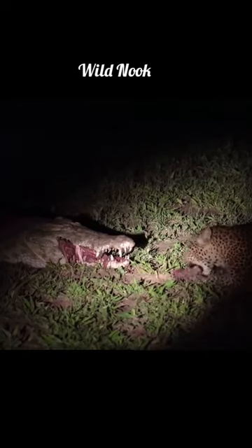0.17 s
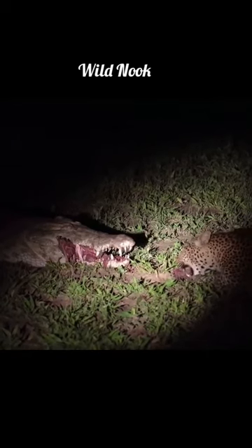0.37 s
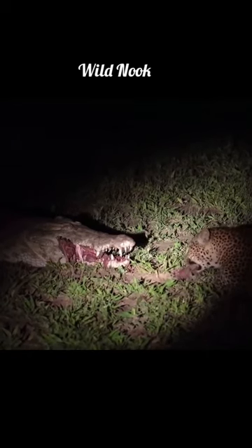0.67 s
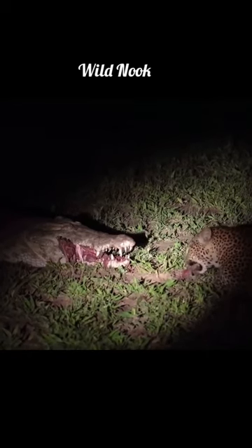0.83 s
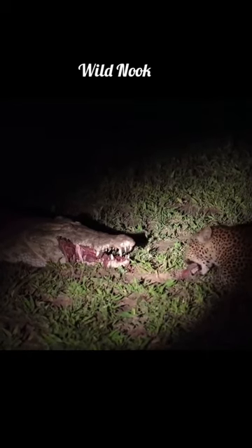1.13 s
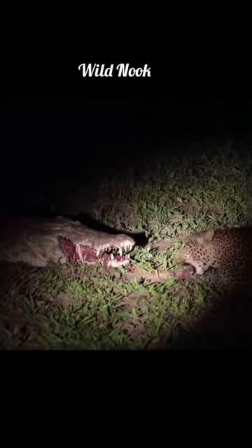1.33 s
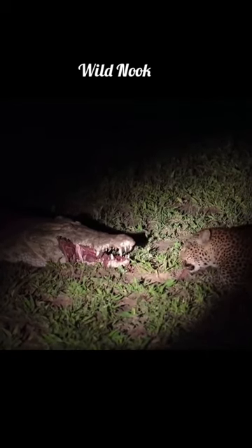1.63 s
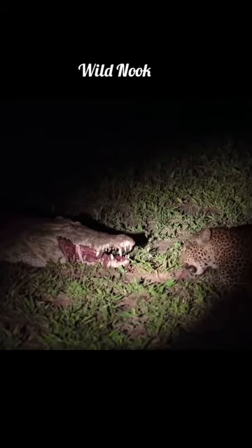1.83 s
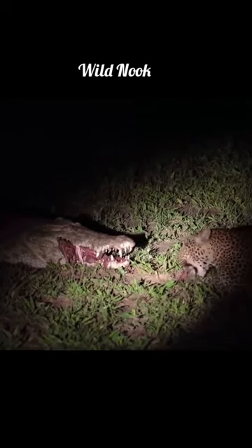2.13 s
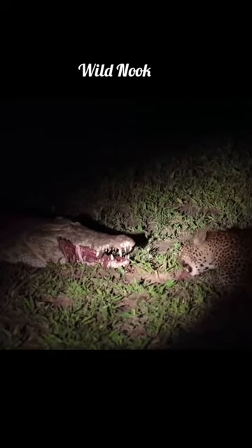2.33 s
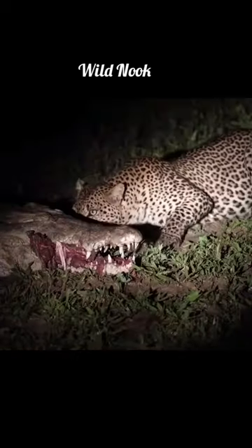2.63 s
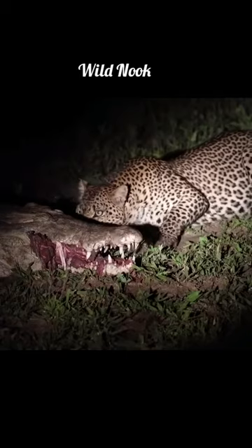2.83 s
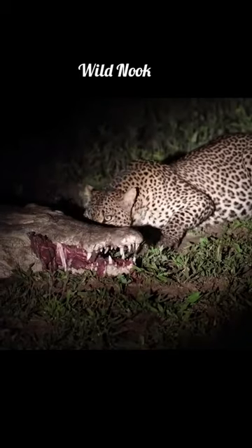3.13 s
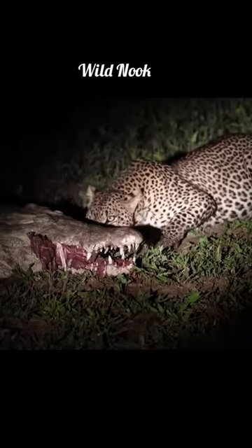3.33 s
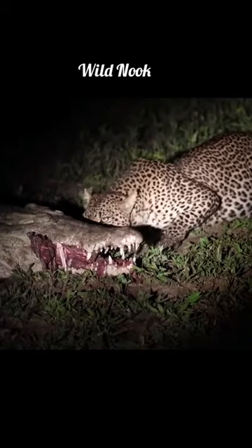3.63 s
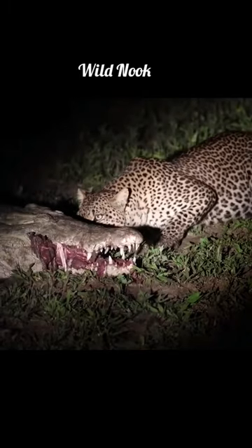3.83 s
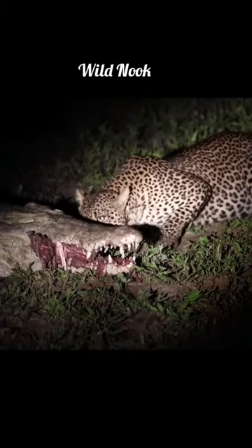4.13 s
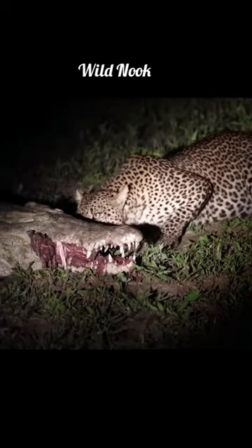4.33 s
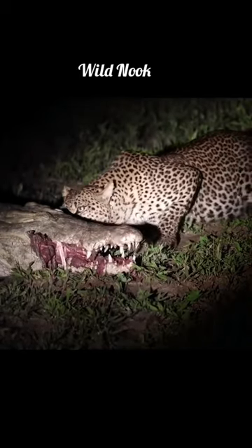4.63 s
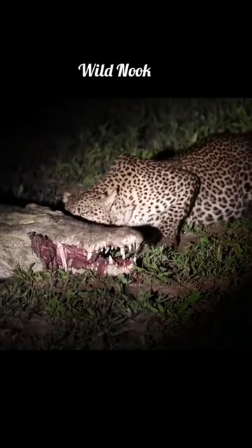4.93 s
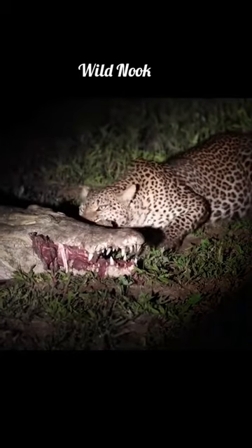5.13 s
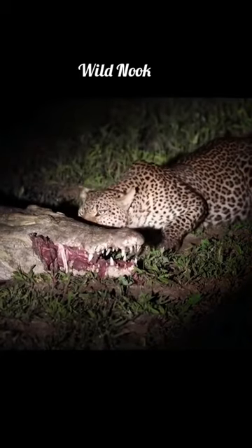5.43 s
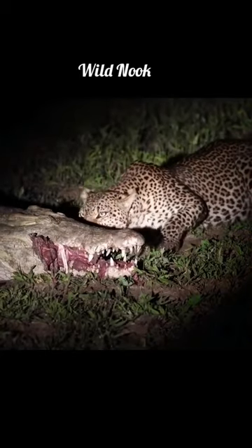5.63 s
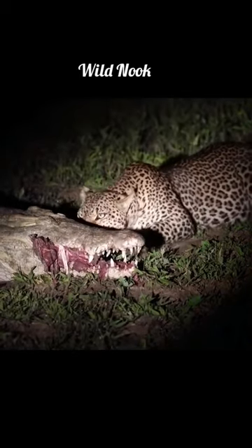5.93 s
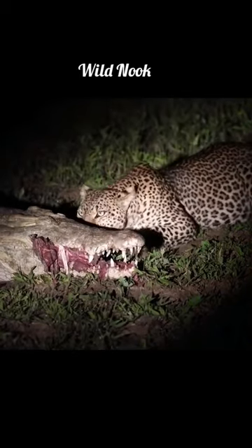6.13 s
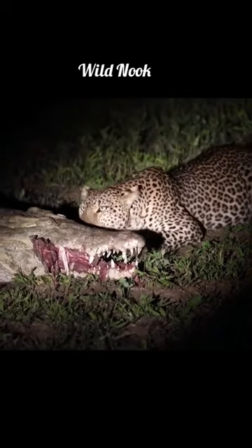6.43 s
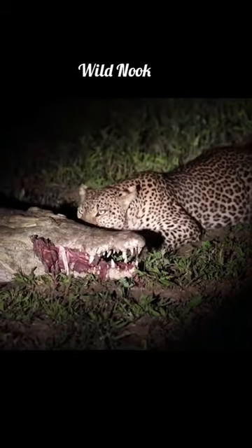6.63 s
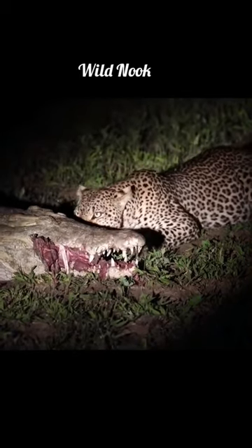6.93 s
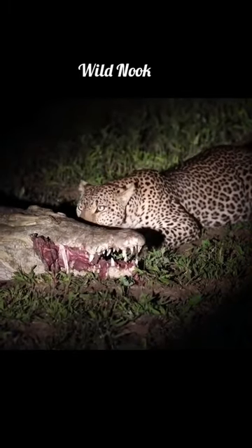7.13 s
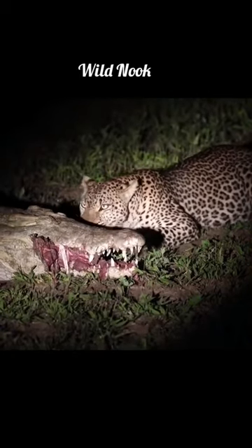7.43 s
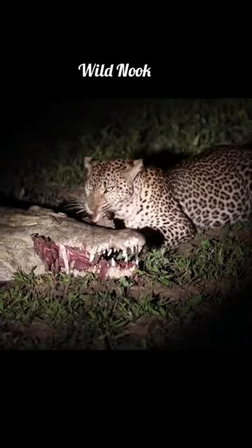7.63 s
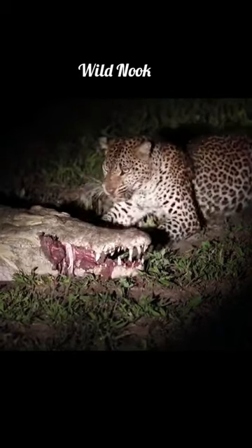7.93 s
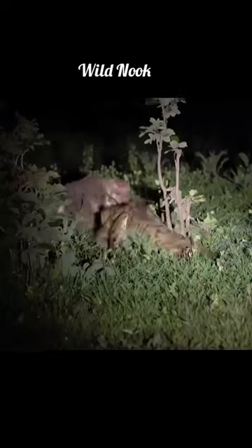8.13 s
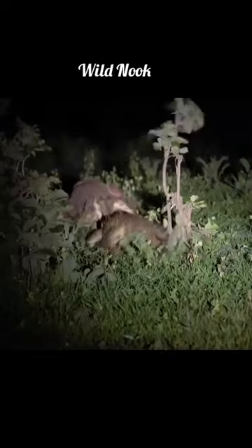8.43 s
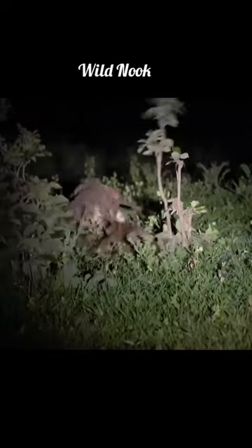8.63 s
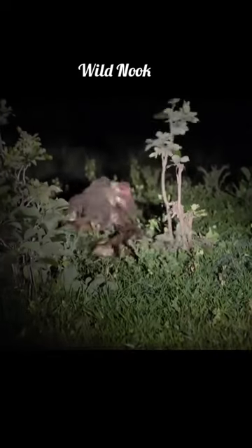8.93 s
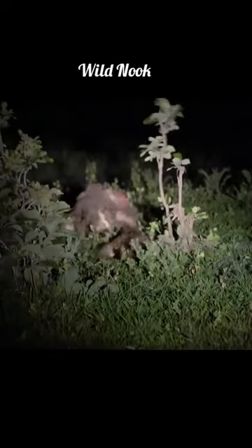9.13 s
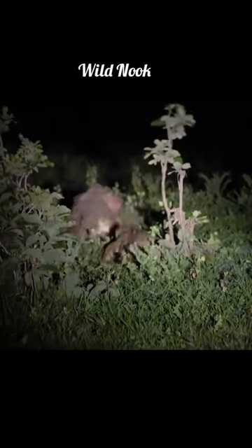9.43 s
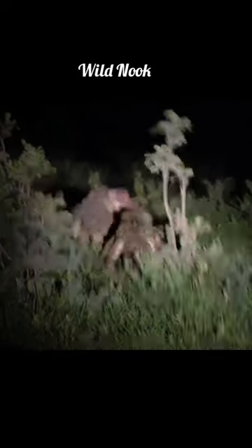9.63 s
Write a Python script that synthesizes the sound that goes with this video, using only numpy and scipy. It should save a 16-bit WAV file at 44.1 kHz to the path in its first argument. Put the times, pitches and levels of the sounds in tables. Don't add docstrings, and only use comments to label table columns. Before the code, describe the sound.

Outdoors at night, short high frog whistles sit mostly left over a dense rasp of insects, with a bush-cricket buzzing in regular bursts. Grass stirs and faint bat sweeps pass. After a cut, a big cat gives low, pulsing growls close by. Another cut removes the growl, leaving snapping stems and swishing leaves. Stereo phone microphone, open air.

```python
import sys
import numpy as np
from scipy import signal
from scipy.fft import rfft, irfft
from scipy.io import wavfile
from scipy.ndimage import uniform_filter1d

SR = 44100
rng = np.random.default_rng(int(sys.argv[2]) if len(sys.argv) > 2 else 0)


def convert_level_to_amplitude(level_db):
    exponent = np.asarray(level_db, float) / 20
    return 10 ** exponent


def output_pcm(signal):
    pcm = np.clip(np.atleast_2d(signal).T, -1, 1) * 32767
    wavfile.write(sys.argv[1], SR, np.round(pcm).astype(np.int16))


N = 430857
T = np.arange(N) / SR
HZ = np.fft.rfftfreq(N, 1 / SR)
FIRST_CUT_S, SECOND_CUT_S = 2.58, 8.125


def level(x, db):
    return x * convert_level_to_amplitude(db) / np.sqrt(np.mean(x ** 2))


def curve(rows):
    s, db = np.transpose(rows)
    return np.interp(T, s, db, left=-120, right=-120)


def bouts(rows, fade_s):
    gain = sum(convert_level_to_amplitude(db) * ((T >= start) & (T < end)) for start, end, db in rows)
    return uniform_filter1d(gain, size=int(fade_s * SR))


def walk(rate):
    k = int(SR / rate)
    steps = np.repeat(rng.standard_normal(N // k + 1), k)
    return 1.7 * uniform_filter1d(uniform_filter1d(steps, k), k)[:N]


def add(out, s, x):
    i = max(int(s * SR), 0)
    out[..., i:i + x.shape[-1]] += x[..., :N - i]


def place(x, pan_db, size):
    return np.array([x * convert_level_to_amplitude(pan_db / 2), np.roll(x, size) * convert_level_to_amplitude(-pan_db / 2)])


def chirp(hz, shape):
    return shape * np.sin(2 * np.pi * np.cumsum(hz) / SR)


def band(x, low_hz, high_hz):
    return signal.sosfilt(signal.butter(4, [low_hz, high_hz], "band", fs=SR, output="sos"), x)


def throat(flow, modes):
    out = 0
    for hz, width, db in modes:
        b, a = signal.iirpeak(hz, hz / width, fs=SR)
        out = out + convert_level_to_amplitude(db) * signal.lfilter(b, a, signal.lfilter(b, a, flow))
    return out


def haze(spectrum, alike_hz, flicker_db, rate):
    hz, db = np.transpose(spectrum)
    octave = np.log2(HZ + 1)
    colour = convert_level_to_amplitude(np.interp(octave, np.log2(hz), db, left=-120, right=-120))
    mid, side = rfft(rng.standard_normal((2, N))) * colour
    both = mid + np.minimum(HZ / alike_hz, 1) * side * np.array([[1], [-1]])
    out = 0
    for centre in np.arange(np.log2(hz[0]), np.log2(hz[-1]) + .5, .5):
        part = irfft(both * np.clip(1 - 2 * abs(octave - centre), 0, 1), N)
        out = out + part * convert_level_to_amplitude(flicker_db * walk(rate))
    return out


# start in seconds, peak level in dB, pitch in Hz.
LOW_FROGS = [(0.0246, -30, 2508), (0.2678, -32, 2514), (0.3735, -33, 2570), (0.5775, -32, 2473),
             (1.494, -31, 2490), (1.9968, -36, 2420), (2.0632, -30, 2540), (2.2143, -33, 2520),
             (2.5717, -32.5, 2550), (2.6399, -34, 2510), (3.118, -33, 2515), (3.372, -34.5, 2580),
             (3.5688, -34, 2470), (3.7242, -33.5, 2430), (4.1025, -33, 2490), (4.567, -36, 2610),
             (4.7092, -35.5, 2614), (5.0206, -32.5, 2510), (6.0082, -33.5, 2500), (7.0381, -35, 2480),
             (7.2, -35, 2480), (7.4145, -34, 2510), (7.673, -34, 2460), (8.094, -28.5, 2525),
             (8.1585, -32, 2540), (8.6178, -33.5, 2532), (8.765, -34, 2454), (9.2378, -32.5, 2430),
             (9.5971, -34, 2492), (9.6699, -37.5, 2520)]
# start in seconds, peak level in dB, pitch in Hz.
HIGH_VOICES = [(0.034, -33.5, 2740), (0.571, -33.5, 2735), (1.042, -33.5, 2660), (1.15, -34, 2700),
               (1.299, -29.5, 2730), (1.889, -29, 2740), (2.4633, -29.5, 2715), (3.0634, -36, 2670),
               (3.513, -35, 2750), (3.9965, -35, 2760), (4.405, -35.5, 2672), (4.835, -36, 2656),
               (5.34, -32, 2620), (8.557, -32.5, 2690), (9.0363, -34, 2700)]
# start in seconds, peak level in dB, pitch in Hz.
FARTHER_FROGS = [(0.162, -35, 2430), (0.3287, -35, 2530), (0.426, -33, 2610), (0.7467, -33, 2420),
                 (0.833, -45, 2450), (0.8799, -33.5, 2540), (0.9262, -34.5, 2480), (0.9685, -35, 2580),
                 (1.3867, -34.5, 2490), (1.434, -31, 2580), (1.5703, -39, 2480), (1.6637, -30.5, 2530),
                 (1.7908, -37, 2510), (2.1475, -38, 2450), (2.3057, -35, 2460), (2.3555, -36, 2456),
                 (2.772, -33.5, 2340), (2.8424, -36, 2380), (3.0008, -38, 2420), (3.2056, -33, 2420),
                 (3.4394, -35, 2380), (3.64, -39.5, 2380), (3.8242, -39, 2420), (4.1977, -32.5, 2420),
                 (4.2546, -43, 2420), (4.333, -35, 2445), (4.6298, -34, 2480), (4.8963, -35.5, 2550),
                 (5.0699, -32, 2536), (5.119, -37, 2530), (5.2016, -35.5, 2475), (5.2545, -39, 2564),
                 (5.3727, -32, 2550), (5.4408, -32.5, 2540), (5.4979, -40, 2470), (5.6281, -43, 2370),
                 (5.676, -41, 2590), (5.7174, -35, 2500), (5.772, -35.5, 2520), (5.8396, -32.5, 2720),
                 (6.131, -35.5, 2700), (6.2778, -37, 2450), (6.5992, -39, 2484), (6.6932, -43, 2480),
                 (6.8023, -38, 2525), (6.9174, -39, 2570), (7.1292, -40, 2720), (7.3152, -32.5, 2506),
                 (7.7316, -44, 2560), (7.864, -37, 2480), (8.0032, -36, 2670), (8.2162, -36.5, 2620),
                 (8.2756, -36, 2490), (8.413, -34.5, 2566), (8.6797, -39, 2380), (9.1323, -32, 2506),
                 (9.3636, -38, 2383), (9.4444, -33.5, 2710), (9.749, -37, 2382)]


def frogs(calls):
    out = np.zeros(N)
    for (s, db, hz), (longer, flutter) in zip(calls, rng.random((len(calls), 2))):
        u = np.linspace(0, 1, int(SR * .028 * (.75 + .5 * longer)))
        shape = np.minimum(u / .12, 1) * (1 - u ** 3)
        shape = shape * (1 - .25 * flutter * (1 + np.cos(2 * np.pi * 3 * u)))
        rise = 1 + .125 * (u ** 0.745 - .5)
        add(out, s, convert_level_to_amplitude(db + 3.5) * chirp(hz * rise, shape))
    return out


def crowd():
    spread, lowest = [N / SR, 6, 320], [0, -48.5, 2400]  # s, dB, Hz
    left, ahead = rng.random((2, 170, 3)) * spread + lowest
    return place(frogs(left), 7.9, size=8) + place(frogs(ahead), 0.5, size=5)


# start in seconds, end in seconds, level in dB.
BUZZ_BURSTS = [(0.029, 0.213, -41), (0.644, 0.92, -39.5), (0.998, 1.325, -42), (1.338, 1.576, -36.5),
               (1.734, 1.997, -37), (2.129, 2.406, -36), (2.577, 2.763, -35), (2.894, 3.178, -36),
               (3.308, 3.624, -36), (3.74, 4.025, -37), (4.149, 4.435, -35), (4.57, 4.85, -36),
               (4.984, 5.205, -35.5), (5.591, 5.79, -35.5), (6.018, 6.26, -35.5), (6.429, 6.67, -35.5),
               (6.828, 7.074, -35), (7.214, 7.47, -34.5), (7.615, 7.861, -35.5), (8.105, 8.212, -35.5),
               (8.341, 8.663, -36.5), (8.774, 9.071, -36), (9.18, 9.477, -35.5), (9.605, 9.8, -35.5)]
# multiple of the tooth rate, level in dB.
WING_OVERTONES = [(42, -14), (43, -4), (44, -3), (45, 0), (46, -0.5), (47, -6), (48, -15)]


def bush_cricket():
    since = sum((T - a) * ((T > a - .02) & (T < b + .02)) for a, b, _ in BUZZ_BURSTS)
    stroke = 2 * np.pi * (51 * since + .08 * walk(12) - .25)
    stroke_db = 5
    teeth = 2 * np.pi * np.cumsum(139.8 * (1 + .0022 * walk(25))) / SR
    clean = 0
    for k, db in WING_OVERTONES:
        throb_db = stroke_db * np.cos(stroke + .3 * (k - 45))
        clean = clean + convert_level_to_amplitude(db + 1.5 * walk(40) + throb_db) * np.cos(k * teeth + .8 * (k - 45) ** 2)
    ragged = band(rng.standard_normal(N), 5920, 6595) * convert_level_to_amplitude(stroke_db * np.cos(stroke))
    gate = 0
    for start, end, db in BUZZ_BURSTS:
        swell_db = ((T - start) / 0.4 - .5).clip(-1, 1)
        gate = gate + convert_level_to_amplitude(db + swell_db) * ((T > start) & (T < end))
    return level(level(clean, 0) + level(ragged, -6), 0.5) * uniform_filter1d(gate, size=600)


# time in seconds, level in dB.
SWARM_LEVEL = [
    (0, -40),
    (.5, -47.5),
    (.8, -38.5),
    (1.3, -37),
    (1.6, -36),
    (1.7, -42.5),
    (9.4, -42),
    (9.77, -43),
]


def swarm():
    colour = [(5200, -18.0), (5900, -8), (6500, -12), (7200, -7.5), (7900, -28.0), (8500, -23.0)]  # Hz, dB
    rasp = haze(colour, 6000, 1.1, 14)
    throb = convert_level_to_amplitude(1.6 * np.sin(2 * np.pi * np.cumsum(73 * (1 + 0.0312 * walk(4.5))) / SR))
    return level(rasp * throb, 2.87) * convert_level_to_amplitude(curve(SWARM_LEVEL) + 1.8 * walk(4))


# time in seconds, level in dB.
SHRILL_LEVEL = [
    (0, -51.5),
    (2.95, -50),
    (3.05, -52.5),
    (8.6, -51),
    (8.75, -48.5),
    (9.77, -47.5),
]


def shrill():
    colour = [(8300, -7), (9300, -9), (10500, -3.5), (11600, 0.5), (13500, -2), (14600, -4), (15500, -7)]
    hiss = haze(colour, 6000, 1.0, 16)
    fresh_s = np.where(T < FIRST_CUT_S, 1.2, 5.64)
    faded = (T - fresh_s) / .585 % 1
    throb_db = 5 * uniform_filter1d(.5 - faded, size=2500) * np.where(T < SECOND_CUT_S, 1, .3)
    return level(hiss, 0.48) * convert_level_to_amplitude(curve(SHRILL_LEVEL) + throb_db)


# frequency in Hz, level in dB per Hz.
FAR_SPECTRUM = [(1500, -50), (1900, -17), (2220, -10), (2540, -5.5), (2860, -12), (3050, -24), (3500, -21),
                (4260, -6.5), (4920, -11), (6230, -5), (7510, -3.5), (8300, -20), (9000, -45)]


def far_chorus():
    return level(haze(FAR_SPECTRUM, 3000, 1.3, 8), -38)


# (frequency in Hz, level in dB per Hz).
LOW_AIR = [
    (0, 2.58, -58, [(15, -54), (25, -37), (90, -18), (384, -22), (534, -15), (909, -10.5), (1390, -12), (2000, -9), (2600, -45), (4400, -120)]),
    (2.58, 8.125, -57.5, [(15, -39), (25, 7.5), (65, -4), (266, -12.5), (554, -7), (757, -9), (926, -2.5), (1050, -7), (1610, -5.5), (2000, -6.5), (2600, -58), (4400, -120)]),
    (8.125, 9.78, -54.5, [(15, -36), (25, -9), (112, -8.5), (338, -9), (814, -16), (909, -5.5), (1520, -4.5), (2000, -0.5), (2600, -24), (4400, -120)]),
]


def air():
    out = 0
    for start, end, db, colour in LOW_AIR:
        gate = uniform_filter1d(1. * ((T >= start) & (T < end)), size=200)
        out = out + level(haze(colour, 630, 3.28, 7.6), db) * gate
    return out


# start in seconds, end in seconds, level in dB.
GRASS_MOVES = [
    (0, 0.62, -62),
    (.6, 1.69, -58),
    (1.78, 2.63, -64.5),
    (2.58, 8.3, -64.5),
    (8.12, 8.4, -63.5),
    (8.4, 9.8, -56.5),
]
# time in seconds, peak level in dB, thud pitch in Hz, left minus right in dB.
STEM_SNAPS = [(0.097, -48.5, 760, 5), (1.12, -53, 210, 0.5), (1.191, -52, 820, 6), (1.5, -54, 199, -2),
              (7.021, -45, 1200, 0.5), (8.7, -68, 175, 0.5), (1.231, -33.5, 1830, -12),
              (1.615, -35.5, 2160, -16), (1.721, -47, 1200, -20), (1.738, -40, 720, -7),
              (2.666, -51, 615, -2.0), (3.511, -39.5, 223, 0), (3.725, -44, 655, -3),
              (4.043, -36.5, 784, -1), (4.797, -42, 895, -2), (4.858, -34.5, 1230, -1),
              (8.084, -45, 1225, 3), (8.439, -43, 1470, 6), (8.552, -42, 212, 0), (8.628, -40, 1210, 5),
              (8.792, -38, 1637, 3), (8.818, -39, 1460, -1), (9.04, -56, 1490, 18), (9.084, -36.5, 753, 1),
              (9.131, -38, 1500, 6), (9.472, -39, 1390, 1), (9.724, -40.5, 1576, -2)]
# time in seconds, peak level in dB, pitch in Hz, left minus right in dB.
PAW_CRACKLES = [(3.479, -49, 541, -0.5), (3.599, -45, 880, 0.0), (6.479, -44, 719, 0.0),
                (8.399, -45, 1910, -2), (8.519, -48, 1920, 2), (8.739, -40, 1967, 0.0),
                (8.759, -36, 1676, -1.0), (8.839, -48, 1320, 0.0), (9.006, -47, 1700, 1.5),
                (9.115, -37.5, 1160, -0.5), (9.226, -45, 1400, 0.5), (9.438, -41, 1940, -1.0),
                (9.531, -43, 1462, -1)]


def grass():
    struck = rng.random((2, N)) < 1500 / SR
    size = convert_level_to_amplitude(2.8 * rng.exponential(size=(2, N)).clip(0, 5))
    grains = struck * size * rng.standard_normal((2, N))
    grains = grains + 2.14 * grains[::-1]
    rustle_s = 0.069
    rustles = [(s - rustle_s / 2, s + rustle_s / 2, db - 22.5) for s, db, _, _ in STEM_SNAPS]
    stir = bouts(GRASS_MOVES + rustles, 0.058) * convert_level_to_amplitude(1.23 * walk(5.5))
    out = level(band(grains, 269, 5070), 2.7) * stir
    t = np.arange(900) / SR
    snaps = STEM_SNAPS + [(s, db - 3.5, hz, pan_db) for s, db, hz, pan_db in PAW_CRACKLES]
    noises = rng.standard_normal((len(snaps), 2, 900)) + 14 * (t == 0)
    for (s, db, hz, pan_db), noise in zip(snaps, noises):
        crack = .6 * min(hz / 800, 1) ** 2 * band(noise[0] * np.exp(-t / .0022), 300, 4500)
        thud = throat(noise[1] * np.exp(-t / .006), [(hz, .8 * hz, 0), (.4 * hz, .3 * hz, -3)])
        thud = band(1.3 * thud / abs(thud).max(), 90, 6000)
        add(out, s, place(convert_level_to_amplitude(db) * (thud + crack), pan_db, size=0))
    return out


# time of the lowest note in seconds, peak level in dB,
# lowest frequency in Hz, level of the falling sweep in dB.
BAT_CALLS = [
    (.93, -52, 11800, -8),
    (1.2, -44, 11700, -16),
    (1.33, -46, 11200, -8),
    (1.64, -41, 11400, -10),
    (1.93, -42, 11400, -14),
    (2.24, -39, 11600, -16),
    (2.482, -39, 11500, -8),
    (2.73, -42, 11100, -16),
    (2.95, -45, 11400, -6),
    (3.91, -48, 12800, -8),
]


def bat():
    out, t = np.zeros(N), np.arange(-.034, .01, 1 / SR)
    for s, db, hz, sweep_db in BAT_CALLS:
        shape_db = [-40, sweep_db - 4, sweep_db, 0, 0, -30]
        shape = convert_level_to_amplitude(np.interp(t, [-.034, -.03, -.012, -.005, .006, .01], shape_db))
        call = convert_level_to_amplitude(db) * chirp(hz + 150000 * np.maximum(-.007 - t, 0), shape)
        add(out, s - .034, call)
        add(out, s - .017, convert_level_to_amplitude(-11) * call)
        add(out, s - .003, convert_level_to_amplitude(-13) * call)
    return out


# start in seconds, end in seconds, level in dB.
TRILL_BOUTS = [
    (1.07, 2.45, -47.5),
    (3.62, 4.69, -42),
    (5.75, 6.4, -51),
    (7.4, 8.1, -42.5),
    (8.2, 8.8, -47),
    (8.8, 9.8, -42),
]


def cricket():
    rate_hz = 35.6 * (1 + 0.01 * walk(2.5))
    syllable = np.clip(1.5 * np.sin(2 * np.pi * np.cumsum(rate_hz) / SR), 0, 1)
    rough = 1 + .15 * walk(200)
    tone_hz = 4525 * (1 + 0.002 * walk(8) + .0015 * walk(90))
    trill = bouts(TRILL_BOUTS, 0.067) * convert_level_to_amplitude(11.0 + 1.55 * walk(18)) * chirp(tone_hz, syllable * rough)
    on = np.clip(3 * np.sin(2 * np.pi * 5.2 * (T - 7.37)) + .3, 0, 1)
    neighbour = chirp(4156 + 0 * T, (T > 1.95) * on * (1 + 0.46 * walk(150)))
    return trill + convert_level_to_amplitude(-55 + 2.5 * walk(0.96)) * neighbour


# start in seconds, strongest moment in seconds, end in seconds,
# peak level in dB, sag by the end in dB.
CAT_BREATHS = [(2.61, 2.74, 2.86, -55, 1), (3.09, 3.11, 3.13, -57, 4), (3.39, 3.56, 3.82, -55, 3),
               (3.83, 3.97, 4.13, -43.5, 3), (4.16, 4.33, 4.57, -48.5, 4), (4.668, 4.77, 5.0, -41, 11),
               (5.1, 5.29, 5.56, -47.5, 8), (5.86, 6.17, 6.36, -52, 12), (6.45, 6.56, 6.68, -56, 3),
               (6.78, 6.88, 7.22, -43.5, 8), (7.442, 7.6, 7.72, -59, 0), (7.68, 7.83, 8.12, -48.5, 2)]


def effort():
    rest_db = -68
    tracks = [curve([(FIRST_CUT_S, rest_db), (SECOND_CUT_S, rest_db)])]
    for start, top, end, db, sag_db in CAT_BREATHS:
        tracks.append(curve([(start - .08, rest_db), (start, db - 11), (top, db),
                             (end, db - sag_db), (end + .05, rest_db)]))
    return convert_level_to_amplitude(np.max(tracks, axis=0) * np.where(T < SECOND_CUT_S, 1, 2))


def swaying(flow, modes):
    up = np.clip(.5 + .45 * walk(7), 0, 1)
    sway = .1 * np.minimum(150 / np.array(modes)[:, 0], 1) ** .5
    out = 0
    for share, side in ((up, 1), (1 - up, -1)):
        moved = [(hz * (1 + side * k), width, db) for (hz, width, db), k in zip(modes, sway)]
        out = out + throat(flow * np.sqrt(share), moved)
    return out


PURR, RASP, SNARL, TEAR = (.25, .015, .03), (.4, .06, .02), (.27, .012, .87), (.65, .09, .90)
# first beat in seconds, end in seconds,
# rate at start in Hz, rate at end in Hz, manner.
THROAT_BEATS = [(2.625, 2.89, 21.5, 21, RASP), (3.1, 3.12, 21, 21, RASP), (3.404, 3.83, 19, 19, RASP),
                (3.841, 4.1, 24.3, 19, PURR), (4.118, 4.59, 20.3, 20.1, PURR), (4.677, 4.71, 19, 19, SNARL),
                (4.729, 4.85, 27, 33, TEAR), (4.857, 5.02, 24.5, 16.5, SNARL), (5.12, 5.18, 21, 21, RASP),
                (5.195, 5.57, 20.4, 19.2, SNARL), (5.865, 6.03, 23, 23, RASP), (6.04, 6.29, 25, 24.5, PURR),
                (6.31, 6.39, 23, 23, RASP), (6.45, 6.69, 21, 21, RASP), (6.779, 6.84, 23, 23, SNARL),
                (6.848, 6.96, 29, 28, TEAR), (6.98, 7.23, 24.2, 18.3, SNARL), (7.45, 7.78, 24, 24, RASP),
                (7.795, 8.11, 25.5, 23, PURR)]
# frequency in Hz, width in Hz, level in dB.
SHUT_THROAT = [(67, 36, 3), (104, 50, 2.5), (168, 50, -9), (560, 60, -8.5)]
# frequency in Hz, width in Hz, level in dB.
OPEN_THROAT = [(66, 42, 1), (105, 60, -4), (198, 44, 2), (422, 55, -2), (752, 64, -8), (943, 100, -7),
               (1450, 500, -14)]


def cat():
    slaps, mouth, leak = np.zeros((3, N))
    for start, end, hz0, hz1, (half, uneven, opening) in THROAT_BEATS:
        ready = int((start - .03) * SR)
        mouth[ready:] = opening
        leak[ready:] = .25 + 4 * uneven
        s = start
        for a, b, c in rng.standard_normal((40, 3)):
            period = (1 + uneven * a) / np.interp(s, [start, end], [hz0, hz1])
            slaps[int(s * SR)] -= convert_level_to_amplitude((1.2 + 5 * uneven) * b)
            if s + period > end:
                break
            slaps[int((s + period * (.45 + .09 * b)) * SR)] -= half * convert_level_to_amplitude(3 * c)
            s += period
    pulses = np.convolve(slaps, np.exp(-np.arange(400) / 30.))[:N]
    breath = effort()
    flow = level(pulses, 5.8) + leak * level(rng.standard_normal(N), 1.5)
    flow = flow * breath * convert_level_to_amplitude(1.5 * walk(14))
    strain = np.minimum(breath / convert_level_to_amplitude(-47), 1)
    kick = convert_level_to_amplitude(-15) * band(level(pulses, 4.6) * breath * mouth, 55, 250)
    tick = convert_level_to_amplitude(-34) * band(level(slaps, 0) * breath * mouth * strain, 300, 1700)
    inward = flow * (1 - mouth)
    shut = band(swaying(inward, SHUT_THROAT[:2]), 18, 190) + swaying(inward * strain ** .7, SHUT_THROAT[2:])
    outward = flow * mouth
    opened = swaying(outward, OPEN_THROAT[:3]) + throat(outward * strain, OPEN_THROAT[3:])
    voice = band(opened + kick + tick - shut, 24, 2800)
    return convert_level_to_amplitude(-2.0) * voice * uniform_filter1d(1. * (T < SECOND_CUT_S), size=200)


# start in seconds, end in seconds, level in dB.
TOAD_DRONES = [
    (5.15, 6.0, -67),
    (6.0, 6.9, -75),
    (6.95, 7.8, -66.5),
]


def toad():
    return level(throat(rng.standard_normal(N), [(905, 55, 0)]), 0) * bouts(TOAD_DRONES, .1)


# start in seconds, end in seconds, level in dB.
LEAF_SWISHES = [
    (8.71, 8.84, -47.5),
    (9.02, 9.16, -46.5),
    (9.2, 9.3, -53),
    (9.4, 9.56, -46.5),
    (9.68, 9.8, -50),
]


def leaves():
    ticks = convert_level_to_amplitude(3.0 * rng.exponential(size=(2, N)).clip(0, 4)) * rng.standard_normal((2, N))
    swish = level(band(ticks, 2800, 4900), 0.1) + level(band(ticks, 8000, 15000), -0.76)
    return swish * bouts(LEAF_SWISHES, 0.02) * convert_level_to_amplitude(2.5 * walk(25))


def bushes(x, t60):
    t = np.arange(int(.3 * SR)) / SR
    echo = rng.standard_normal((2, len(t))) * np.exp(-np.log(1000) * t / t60)
    return signal.fftconvolve(x[None], echo / np.sqrt(np.sum(echo[0] ** 2)), axes=1)[:, :N]


def scene():
    frog, buzz = frogs(LOW_FROGS + HIGH_VOICES), bush_cricket()
    trill, hunter = cricket(), convert_level_to_amplitude(2.5) * bat()
    bank = crowd() + place(convert_level_to_amplitude(-1.5) * frogs(FARTHER_FROGS), 5.3, size=8)
    near = place(frog, 7.35, size=8) + bank + place(buzz, -2.2, size=0)
    near = near + place(trill, 1.0, size=4) + place(hunter, -1.2, size=0)
    echoed = convert_level_to_amplitude(-8) * (frog + bank[0]) + convert_level_to_amplitude(-8) * buzz + convert_level_to_amplitude(-9) * trill + convert_level_to_amplitude(-12) * hunter
    wet = bushes(echoed, .12)
    chorus = (swarm() + shrill() + far_chorus()) * convert_level_to_amplitude(np.array([[-.6], [.6]]))
    return near + wet + cat() + grass() + leaves() + toad() + air() + chorus


# frequency in Hz, share of the time muted 0-1.
MUTED_SHARE = [(900, 0), (1500, .03), (2000, 0), (2800, 0), (3000, .55), (3250, .6), (3600, .3), (3900, 0),
               (8100, 0), (8600, .85), (9300, .93), (9900, .7), (10700, .01), (14000, .005), (14700, .45),
               (15300, .92)]


def starve(x):
    hz, _, z = signal.stft(x, SR, nperseg=2048)
    centres = hz[4:1024:8]
    power = (abs(z[:, :1024]) ** 2).sum(0).reshape(128, 8, -1).mean(1)
    power = uniform_filter1d(power, size=2, axis=1)
    valley = np.exp(-((centres[:, None] - 3300) / 500) ** 2)
    busy = np.linspace(0, N / SR, power.shape[1]) > SECOND_CUT_S + .2
    chance_db = valley * (5 * rng.standard_normal(power.shape) + 20 * busy)
    power = power / uniform_filter1d(power, size=40, axis=1) ** valley * convert_level_to_amplitude(chance_db)
    share = np.interp(centres, *np.transpose(MUTED_SHARE))
    keep = power >= np.array([[np.quantile(p, q)] for p, q in zip(power, share)])
    z[:, :1024] *= np.repeat(keep, 8, axis=0)
    return signal.istft(z * (hz < 15480)[:, None], SR)[1][:, :N]


def low_pass(x):
    return signal.sosfilt(signal.butter(12, 15840, fs=SR, output="sos"), x)


def record(dry):
    return low_pass(starve(dry))


dry = scene()
out = record(dry)
output_pcm(out)
```